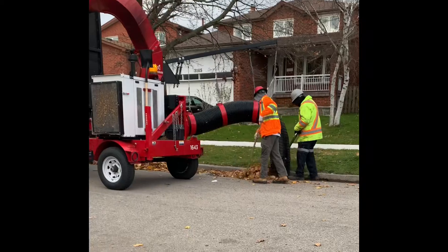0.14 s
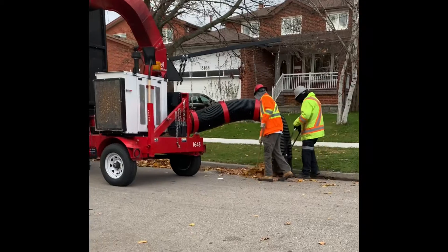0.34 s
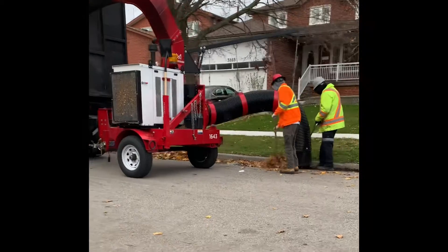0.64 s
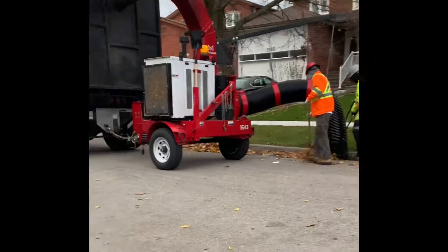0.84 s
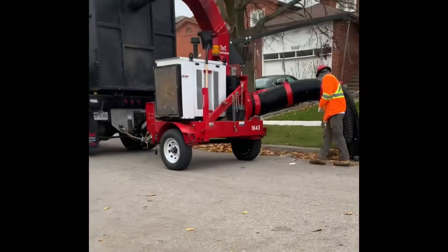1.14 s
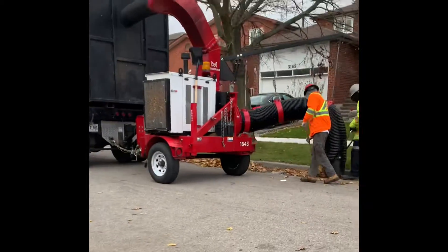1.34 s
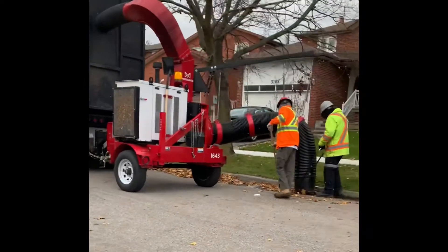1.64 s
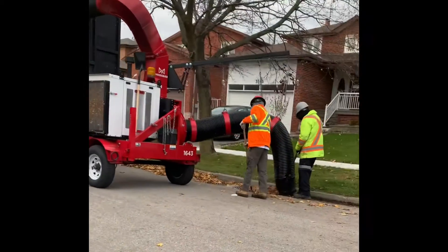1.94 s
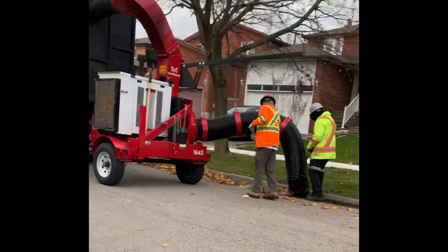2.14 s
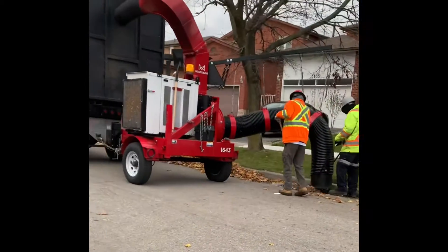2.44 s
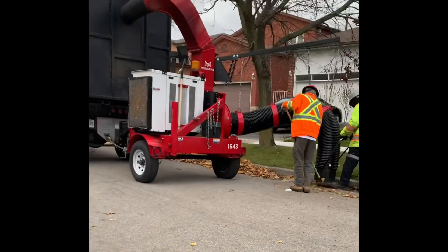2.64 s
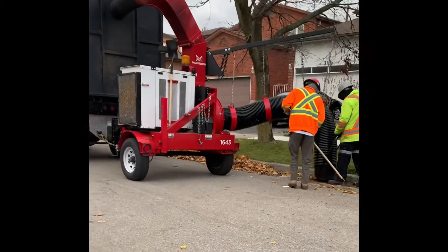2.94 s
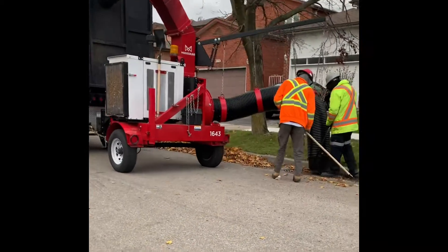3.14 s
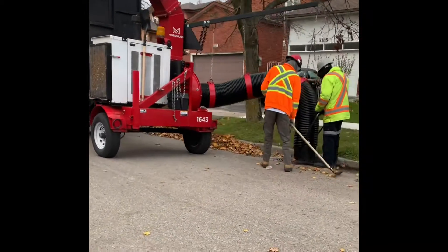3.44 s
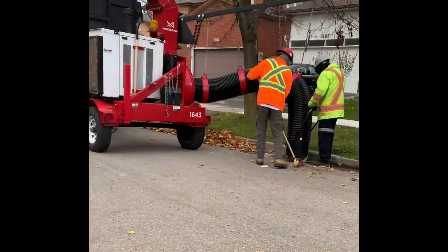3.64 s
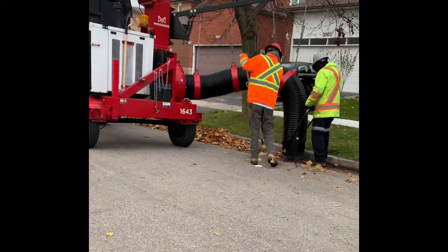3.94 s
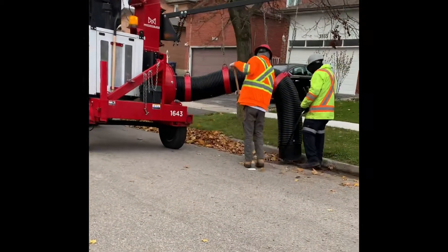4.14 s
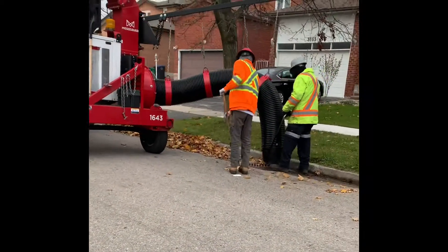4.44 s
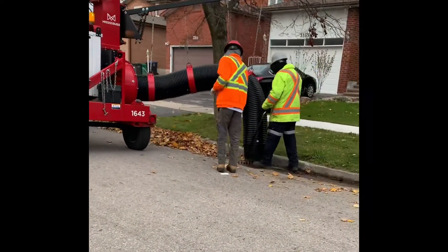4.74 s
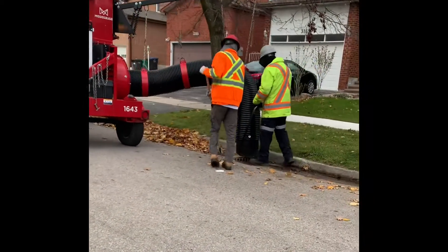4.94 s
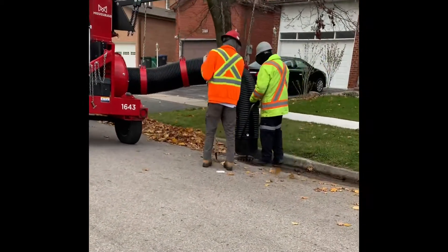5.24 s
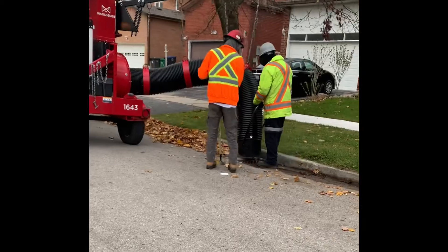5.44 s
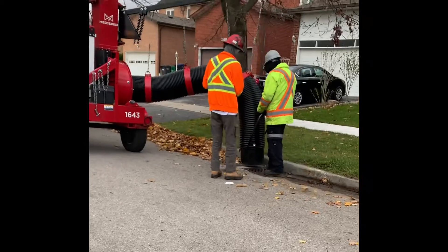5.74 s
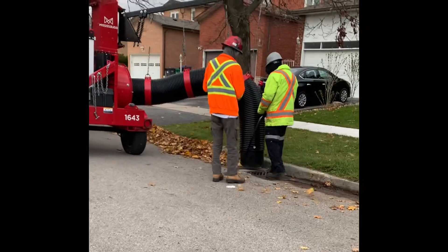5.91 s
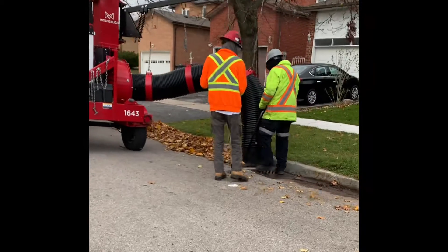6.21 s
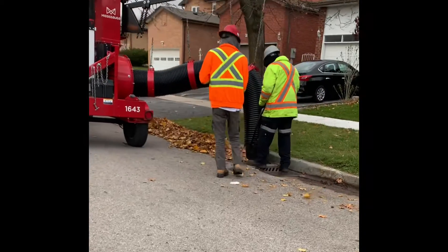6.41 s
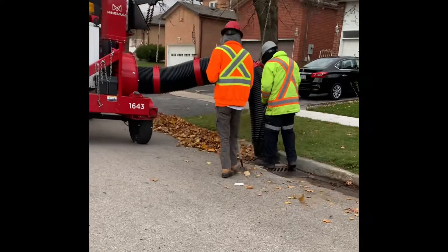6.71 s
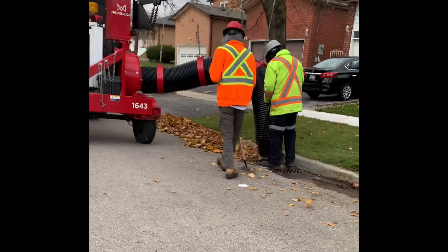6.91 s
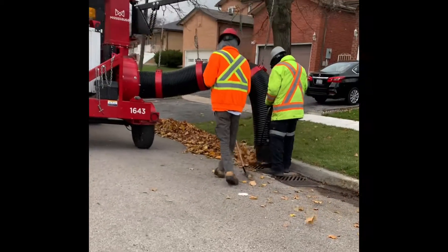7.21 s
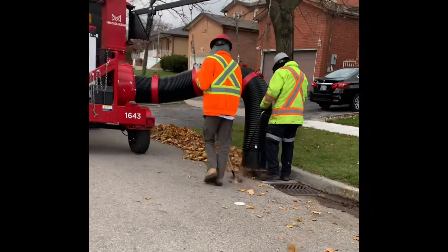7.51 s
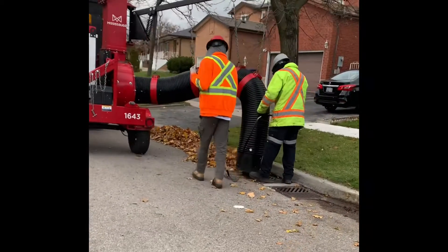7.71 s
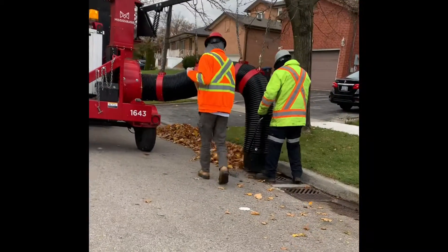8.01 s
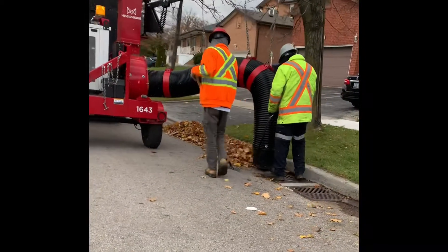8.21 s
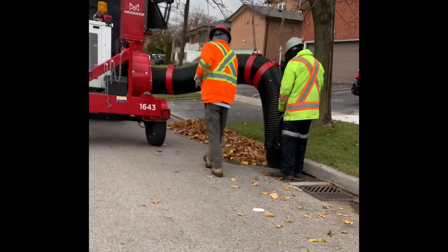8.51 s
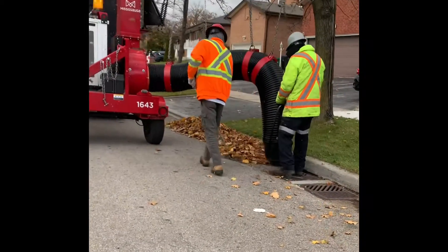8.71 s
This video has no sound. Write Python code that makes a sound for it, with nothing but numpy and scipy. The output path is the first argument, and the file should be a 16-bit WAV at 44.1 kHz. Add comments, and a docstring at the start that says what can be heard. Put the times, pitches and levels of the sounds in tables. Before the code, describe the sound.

A continuous loud machine, heard from some distance and then nearer in wide stereo: rough engine rumble, metallic ticking, thin fan whine and turbulent air. Early on, leaves rustle and crackle and twigs snap sharply inside the housing. Past the middle the clatter brightens as the engine is passed, then the blade hum and rushing roar swell near the hose on the open street.

```python
"""A trailer-mounted leaf vacuum runs at governed speed in a street while the listener walks closer.
Its four-cylinder engine sums cycle harmonics and pulsed noise into throb and clatter; a cooling fan whines.
The impeller adds blade-passing tones, and fluttering noise and wandering resonances carry the airflow.
Leaves crackle as random grains of noise; hard debris strikes the steel housing in decaying bursts."""
import sys
import numpy as np
from scipy import signal
from scipy.fft import rfft, irfft, next_fast_len
from scipy.io import wavfile

SR = 44100
rng = np.random.default_rng(int(sys.argv[2]) if len(sys.argv) > 2 else 0)


def dump(signal):
    """Clip the signal to [-1, 1] and save it as 16-bit WAV at the path in sys.argv[1]."""
    limited = np.clip(np.atleast_2d(signal).T, -1, 1)
    pcm = np.round(limited * 32767).astype(np.int16)
    wavfile.write(sys.argv[1], SR, pcm)


N = 390726
TIME = np.arange(N) / SR
SIZE = next_fast_len(N, True)
BINS = np.maximum(np.arange(SIZE // 2 + 1) * SR / SIZE, 1)  # frequency of each bin in Hz


def from_db(db):
    """Logarithmic level: decibels become an amplitude gain."""
    return 10 ** (np.asarray(db) / 20)


def rms_one(x):
    """Effective value: scale a signal to unit rms."""
    return x / np.sqrt(np.mean(x ** 2) + 1e-20)


def in_time(rows):
    """Linear interpolation: each column of a curve, sample by sample."""
    s, *columns = np.transpose(rows)
    return [np.interp(TIME, s, column) for column in columns]


def drift(rate_hz):
    """Low-passed noise: a random fluctuation of unit rms, drawn every 100 samples."""
    pole = np.exp(-200 * np.pi * rate_hz / SR)
    noise = rng.standard_normal(N // 100 + 2002)
    slow = signal.lfilter([1], [1, -2 * pole, pole * pole], noise)[2000:]  # drop the filter's start-up
    return np.interp(np.arange(N) / 100, np.arange(len(slow)), rms_one(slow))


def shape(points):
    """Spectral envelope: gain per bin, falling 24 dB per octave below the first point."""
    hz, db = np.transpose(points)
    level_db = np.interp(np.log(BINS), np.log(hz), db)
    octaves_below = np.maximum(0, np.log2(hz[0] / BINS))
    return from_db(level_db - 24 * octaves_below)


def resonances(table):
    """Modal superposition: response of a metal part with these modes, per frequency bin."""
    return sum(from_db(db) / np.sqrt(width) / (1 + 2j * (BINS - hz) / width) for hz, width, db in table)


def bump(at_s, half_length_s, db):
    """Gaussian level swell: rises or dips smoothly by db around one moment."""
    return from_db(db * np.exp(-((TIME - at_s) / half_length_s) ** 2))


# The walk towards the machine, as its loudness: start_s [s], level_db [dB]
APPROACH = [(0.1, -50.5), (3.13, -43), (6.41, -38), (7.33, -36), (7.54, -35.5), (8.56, -34), (8.75, -33.5)]


def nearing(db, follows):
    """Level growth with proximity: db at the walk's mean level, scaled by how strongly it follows."""
    near_db, = in_time(APPROACH)
    return from_db(db + follows * (near_db - near_db.mean()))


# Two spaced microphones: frequency_hz [Hz], left_lead_rad [rad], likeness [0 to 1], left_minus_right_db [dB]
MICS = [(90, 0, .66, 0), (400, -.2, .85, .7), (700, 0, .89, 3.7), (1100, -.7, .92, -.3),
        (1900, 0, .88, -.4), (2450, .9, .5, -.6), (3000, 1.2, .78, 0), (4500, 1.2, .98, 0)]
# In the treble the right microphone hears the machine a moment later
MIC_LAG_S, MIC_LAG_ABOVE_HZ = .000238, 3420


def at_mics(direct, gain, envelope=1):
    """Partial coherence: coloured direct sound with a phase lag, along with diffuse street scatter."""
    hz, *columns = np.transpose(MICS)
    lead, alike, balance_db = [np.interp(BINS, hz, column) for column in columns]
    lead = lead + 2 * np.pi * MIC_LAG_S * np.maximum(BINS - MIC_LAG_ABOVE_HZ, 0)
    sides = np.array([[1], [-1]])  # left, right
    straight = rfft(rms_one(direct) * envelope, SIZE) * np.exp(.5j * sides * lead)
    scatter = rfft(rng.standard_normal((2, N)) * envelope, SIZE)
    both = np.sqrt(alike) * straight + np.sqrt(1 - alike) * scatter
    balance = from_db(sides * balance_db / 2)
    return rms_one(irfft(both * gain * balance, SIZE)[:, :N])


def tone(turns, waver, rate_hz):
    """Narrow-band modulation: a line of rms 1 whose strength and phase waver."""
    angle = 2 * np.pi * (turns + rng.random())
    in_phase = (1 + waver * drift(rate_hz)) * np.sin(angle)
    quadrature = waver * drift(rate_hz) * np.cos(angle)
    return rms_one(in_phase + quadrature)


# Relative clatter of each cylinder in firing order: level_db [dB]
CYLINDERS_DB = [4.5, 12.5, 8.5, -4.5]


def knocks(firings, decay_s, uneven_db):
    """Impulsive excitation: jumps at each firing and dies away; the cylinders differ."""
    at = np.flatnonzero(np.diff(np.floor(firings)))
    kicks = np.zeros(N)
    kicks[at] = from_db(np.resize(CYLINDERS_DB, len(at)) + uneven_db * rng.standard_normal(len(at)))
    return rms_one(signal.lfilter([1], [1, -np.exp(-1 / (decay_s * SR))], kicks))


# Engine lines: cycle_multiple [1], level_db [dB at the walk's mean level], follows_approach [1]
ENGINE_ORDERS = [(4, -48.5, 0.8), (5, -52.5, 1), (6, -57, 0.64), (7, -59.5, -0.17), (8, -57, -0.3),
                 (9, -53, 0.64), (10, -52.5, 0.32), (11, -54, 1.6), (13, -49, 1.27), (14, -49.5, 1.1),
                 (15, -57, 0.87), (16, -57, 0.78), (17, -63, 1.2), (18, -51, 1.43), (20, -63, 1.1),
                 (21, -56.5, 0.7), (24, -68.5, 2.3)]
# Exhaust drone at three times the firing rate: start_s [s], level_db [dB]
EXHAUST_DRONE = [(0, -57), (.6, -48.5), (1, -65), (1.4, -56), (1.75, -44), (2.5, -49), (3.5, -49),
                 (4.4, -45.5), (5.3, -45), (5.75, -54), (6.3, -40.5), (6.85, -44), (7.3, -42), (7.7, -35),
                 (8.2, -37.5), (8.65, -33.5)]
# Relative spectra of the exhaust and the casing's rumble: frequency_hz [Hz], level_db [dB per Hz]
EXHAUST = [(20, -23), (35, -7), (48, 1), (60, 5.5), (85, 10), (115, 13), (150, 5.5), (200, -9), (400, -56)]
RUMBLE = [(90, -10), (140, -5), (175, -0.5), (215, 1), (260, -1), (320, -4), (390, -6.5), (450, -18.5),
          (700, -33.5)]
# The deepest rumble dips briefly: centre_s [s], half_length_s [s], change_db [dB]
RUMBLE_DIP = (2.7, 0.64, -3)
PUFFS_DB, EXHAUST_FOLLOWS = -43, 1.12
CASING_DB, CASING_FOLLOWS = -41, 1.15


def engine(firings):
    """Harmonics of the four-stroke cycle: wavering lines over a rough rumble pulsed by the firings."""
    cycles = firings / len(CYLINDERS_DB)
    lines = sum(nearing(db, follows) * tone(cycles * order, waver=.2, rate_hz=3)
                for order, db, follows in ENGINE_ORDERS)
    drone = from_db(in_time(EXHAUST_DRONE)[0]) * tone(3 * firings, waver=.2, rate_hz=4)
    puffs = at_mics(rng.standard_normal(N), shape(EXHAUST))
    throb = 3.5 + .31 * knocks(firings, decay_s=.014, uneven_db=7)
    casing = at_mics(rng.standard_normal(N), shape(RUMBLE), throb)
    rumble = nearing(PUFFS_DB, EXHAUST_FOLLOWS) * bump(*RUMBLE_DIP) * puffs
    rumble = rumble + nearing(CASING_DB, CASING_FOLLOWS) * casing
    return rumble + (lines + drone) * from_db([[.5], [-.5]])  # left slightly louder


# Whine of the belt-driven cooling fan: start_s [s], level_db [dB]
COOLING_FAN = [(0, -54.5), (1, -49), (2, -44), (5.6, -48.5), (6.6, -39.5), (8.86, -51)]
COOLING_FAN_HZ = 166.6  # at governed speed


def cooling_fan(governed_time):
    """Geared rotation: a wavering tone whose pitch keeps a fixed ratio to the engine speed."""
    whine = tone(COOLING_FAN_HZ * governed_time, waver=.17, rate_hz=3)
    return from_db(in_time(COOLING_FAN)[0]) * whine * from_db([[.5], [-.5]])


# Relative spectrum of the ticks: frequency_hz [Hz], level_db [dB per Hz]
CLATTER = [(1000, -25), (2500, -7), (5000, -6), (7600, -7), (8900, 1), (9800, -3), (11700, -3),
           (13000, -10), (15800, -12)]
# Engine metal rings: pitch_hz [Hz], width_hz [Hz], level_db [dB, relative]
METAL = [(3100, 200, -4), (7130, 80, -7), (8370, 90, -2), (8780, 40, -4), (8890, 60, 1), (9060, 100, -3),
         (9225, 45, -1), (9400, 60, -7), (10060, 50, -8), (10730, 30, -3), (11100, 55, -2), (11220, 50, -6),
         (11430, 40, -5), (11900, 50, -8), (12300, 50, -9), (14930, 90, -10)]
TICKS_DB, RINGS_DB, CLATTER_FOLLOWS = -55, -53.5, .94
# The clatter swells while passing beside the engine
BESIDE_ENGINE_S, BESIDE_WIDTH_S, BESIDE_DB = 4.5, 1, 3.5


def clatter(firings):
    """Impact-excited resonance: injectors and valves tick at every firing and set metal ringing."""
    tick_pulses = knocks(firings, decay_s=.005, uneven_db=2.3)
    ring_pulses = knocks(firings, decay_s=.012, uneven_db=3)
    ticks = at_mics(rng.standard_normal(N), shape(CLATTER), tick_pulses)
    rings = at_mics(rng.standard_normal(N), resonances(METAL), ring_pulses)
    swell = from_db(1.5 * drift(9)) * bump(BESIDE_ENGINE_S, BESIDE_WIDTH_S, BESIDE_DB)
    return swell * (nearing(TICKS_DB, CLATTER_FOLLOWS) * ticks + nearing(RINGS_DB, CLATTER_FOLLOWS) * rings)


BLADE_RATIO = 1.9528  # blade passes per engine firing
# Blade hum, faint behind the machine, swelling as the housing comes into view: start_s [s], level_db [dB]
BLADE_HUM = [(.5, -44.5), (1.5, -49.5), (2.3, -57), (3.2, -49.5), (5.6, -49.5), (6.15, -36.5), (6.35, -39),
             (6.6, -30), (7.1, -30), (7.4, -26), (8.8, -28)]
# Overtones, which beam out from the side of the housing:
# start_s [s], second_harmonic_db [dB], third_harmonic_db [dB]
OVERTONES = [(0, -59.5, -73), (1.5, -59, -58), (2.3, -47.5, -66), (3.2, -49.5, -51), (3.9, -50, -58.5),
             (4.3, -55, -49.5), (4.8, -41.5, -52.5), (5.2, -44, -62), (5.7, -47, -44), (6.1, -46, -46),
             (6.8, -55, -43.5), (7.4, -43, -42), (7.85, -40, -39.5), (8.1, -37, -51), (8.8, -39.5, -45.5)]
# Impeller whines: pitch_hz [Hz at governed speed], level_db [dB, relative]
WHINES = [(726.5, -2), (790, -7), (907, 2.5), (1380, -7), (1512, -4), (1820, -7), (2908, -10), (3139, -11)]
WHINE_DB, WHINE_FOLLOWS = -56, .25
# The whines are screened until the impeller housing comes into the open
WHINE_OPENS_S, WHINE_OPENING_S, WHINE_SCREENED_DB = 3.08, .1, -11


def impeller(firings, governed_time):
    """Blade-passing tones: blades pass the housing's lip, giving a deep hum, overtones and thin whines."""
    blades = BLADE_RATIO * firings
    hum = from_db(in_time(BLADE_HUM)[0]) * tone(blades, waver=.025, rate_hz=3.3)
    overtones = sum(from_db(db) * tone(harmonic * blades, waver=.32, rate_hz=4.5)
                    for harmonic, db in enumerate(in_time(OVERTONES), 2))
    whine = sum(from_db(db) * tone(hz * governed_time, waver=.12, rate_hz=6) for hz, db in WHINES)
    screened = (1 - np.tanh((TIME - WHINE_OPENS_S) / WHINE_OPENING_S)) / 2  # 1 hidden, 0 open
    screen = from_db(WHINE_SCREENED_DB * screened)
    tones = hum + overtones + nearing(WHINE_DB, WHINE_FOLLOWS) * screen * whine
    return tones * from_db([[.7], [-.7]])  # left slightly louder


def cyclic_noise(firings, repeat, size=2700):
    """Cyclostationary noise: a share of its power comes back with every four-stroke cycle."""
    one_cycle = signal.resample(rng.standard_normal(size), size * 4)
    again = np.interp(firings / 4 % 1, np.linspace(0, 1, len(one_cycle)), one_cycle)
    return np.sqrt(repeat) * again + np.sqrt(1 - repeat) * rng.standard_normal(N)


# Edges of the bands in which the airstream flutters: frequency_hz [Hz]
EDDY_EDGES_HZ = [550, 800, 1150, 1650, 2400, 3500, 6000, 10000]
EDDY_DB, EDDIES_PER_S = 1.7, 22


def flutter(air):
    """Turbulent modulation: eddies make each band of an airstream swell and sink on its own."""
    out = 0
    for hz in EDDY_EDGES_HZ:
        band = signal.sosfiltfilt(signal.butter(2, hz, fs=SR, output="sos"), air)
        air = air - band  # what remains goes to the higher bands
        out = out + band * from_db(EDDY_DB * drift(EDDIES_PER_S))
    return out + air * from_db(EDDY_DB * drift(EDDIES_PER_S))


# Relative spectra of the housing's roar and the hose's hiss: frequency_hz [Hz], level_db [dB per Hz]
ROAR = [(240, -14), (370, -4.5), (415, -6), (443, -5), (510, -1.5), (680, 1.55), (882, -0.6), (962, -2),
        (1080, -3.5), (1190, -1.7), (1480, -2.5), (1920, -7.5), (2070, -6.5), (2390, -12.5), (2600, -16.5),
        (3380, -18.5), (5720, -120)]
HISS = [(1500, -25), (2000, -5), (2450, -1.5), (2950, 1.2), (3450, -2.1), (4500, -1.8), (6000, -5.4),
        (7600, -8.2), (8900, -2.6), (10000, -6.8), (11800, -7.7), (13000, -12.6), (15000, -13.9)]
# The roar swells as the nozzle comes near: centre_s [s], half_length_s [s], rise_db [dB]
NOZZLE_ROAR = (8.2, 1, 2.1)
ROAR_DB, ROAR_FOLLOWS = -41, .85
HISS_DB, HISS_FOLLOWS = -44, .95


def airflow(firings):
    """Turbulent flow noise: air roars in the housing, throbbing with the firings, and hisses in the hose."""
    throb = 1 + .1 * knocks(firings, decay_s=.012, uneven_db=3)
    roar = at_mics(flutter(cyclic_noise(firings, repeat=.15)), shape(ROAR), throb)
    hiss = at_mics(flutter(cyclic_noise(firings, repeat=.27)), shape(HISS), from_db(.94 * drift(19.5)))
    roar = nearing(ROAR_DB, ROAR_FOLLOWS) * bump(*NOZZLE_ROAR) * roar
    return roar + nearing(HISS_DB, HISS_FOLLOWS) * hiss


# Relative resonances of the hose and chute: pitch_hz [Hz], level_db [dB]
DUCT_MODES = [(520, -4.5), (665, 0.5), (760, 2), (835, 0.5), (1010, -9.5), (1175, -4.5), (1215, -4),
              (1445, -4.5), (2005, -10), (2075, -3), (2125, -5)]
DUCT_DB, DUCT_FOLLOWS = -58.5, 1.04


def ducts():
    """Flow-excited resonance: turbulence sounds each mode in streaks, its pitch wandering with the flow."""
    streaks = 0
    for hz, db in DUCT_MODES:
        turns = hz * np.cumsum(1 + .008 * drift(3)) / SR
        streaks = streaks + from_db(db + 2 * drift(5)) * tone(turns, waver=2, rate_hz=12)
    return nearing(DUCT_DB, DUCT_FOLLOWS) * streaks * from_db([[.7], [-.7]])


# Relative spectrum of leaf crackle and bright strikes: frequency_hz [Hz], level_db [dB per Hz]
STRIKE = [(1200, -22), (2500, -11), (3500, -5), (4700, 0), (7000, -7), (9000, -7), (12000, -16),
          (15500, -24)]
# Loads of dry leaves go up the hose: centre_s [s], half_length_s [s], rise_db [dB]
LEAF_LOADS = [(1.182, 0.22, 5.5), (2.6, 0.86, 6.5), (8.5, 0.34, 2)]
CRACKLE_DB = -51


def leaf_crackle():
    """Random impact process: dry leaves crackle in clumps of decaying grains."""
    leaves_per_s = 600 * from_db(2.8 * drift(9))
    sizes = from_db(2.5 * np.minimum(rng.exponential(1, N), 3))
    leaves = (rng.random(N) < leaves_per_s / SR) * sizes
    grains = signal.lfilter([1], [1, -np.exp(-1 / (.007 * SR))], leaves + 1e-18)  # 7 ms decay
    crackle = at_mics(rng.standard_normal(N), shape(STRIKE), grains)
    loads = np.prod([bump(*load) for load in LEAF_LOADS], axis=0)
    return nearing(CRACKLE_DB, HISS_FOLLOWS) * crackle * loads


# Debris on the housing: start_s [s], level_db [dB before the crack], rise_s [s], t60_s [s],
# dull_body_db [dB relative to the bright burst]
DEBRIS = [(1.573, -37.5, .0003, .05, -10), (1.579, -47, .0003, .04, -10), (1.586, -43.5, .0003, .05, -10),
          (1.964, -41.5, .0005, .07, 0), (1.971, -45.5, .0003, .05, 5), (1.978, -47, .0003, .06, 8),
          (2.021, -41.5, .0005, .06, -2), (2.042, -38.5, .0005, .05, -8), (2.0515, -30, .0003, .06, -9),
          (2.0575, -37.5, .0003, .05, -9), (2.066, -45, .0003, .05, 1), (2.075, -44, .0003, .07, -2),
          (2.112, -40.5, .0005, .06, -10), (2.122, -39, .0003, .06, -10), (2.129, -40.5, .0003, .09, -10),
          (2.745, -43, .0046, .3, -2), (2.834, -39.5, .0006, .1, -5), (2.944, -41, .0006, .08, -8)]
# Relative spectrum of the dull knock: frequency_hz [Hz], level_db [dB per Hz]
THUD = [(300, -9), (700, 14), (1100, 4.5), (1550, 13), (2400, 1), (5000, -39)]
# The struck housing rings: pitch_hz [Hz], width_hz [Hz], level_db [dB, relative]
HOUSING = [(3300, 240, -33), (4600, 290, -6), (5950, 320, -6), (6600, 300, -8)]
HOUSING_DB = -5  # relative to the bright burst
CRACK_DB, CRACK_T60_S = -4, .014  # each strike opens with a brief crack


def debris():
    """Transient impact: twigs and grit shatter in ragged bursts over a dull knock; steel rings briefly."""
    bright, dull = np.zeros((2, N))
    age = TIME[:SR // 2]
    crack = from_db(CRACK_DB - np.minimum(60 * age / CRACK_T60_S, 120))
    for s, db, rise, t60, body_db in DEBRIS:
        span = int(s * SR) + np.arange(len(age))
        dying = from_db(-60 * age / t60) + crack
        burst = from_db(db) * dying * (1 - np.exp(-age / rise))
        bright[span] += burst
        dull[span] += burst * from_db(body_db)
    splinters = from_db(1.5 * drift(600))  # so fast that each drawn value is nearly independent
    ringing = bright * from_db(HOUSING_DB)
    layers = [(bright, shape(STRIKE)), (dull, shape(THUD)), (ringing, resonances(HOUSING))]
    return sum(np.sqrt(np.mean(envelope ** 2)) * at_mics(rng.standard_normal(N), colour, envelope * splinters)
               for envelope, colour in layers)


# Engine speed: start_s [s], firing_rate_hz [firings per s]
SPEED = [(0, 64.4), (.35, 63.3), (.8, 65.05), (1.2, 65.2), (1.7, 64.7), (2.3, 65.35), (2.9, 65.1),
         (3.7, 65.4), (4.6, 65.07), (8.86, 65.03)]


def scene():
    """Common drive: one crankshaft paces engine, fan, clatter and impeller."""
    firings = np.cumsum(in_time(SPEED)[0]) / SR - .75
    governed_time = firings / SPEED[-1][1]  # runs slow when the engine sags under load
    motor = engine(firings) + cooling_fan(governed_time) + clatter(firings)
    air = airflow(firings) + ducts() + leaf_crackle()
    return motor + impeller(firings, governed_time) + air + debris()


def record(dry):
    """Band limitation: an elliptic low-pass cuts the top steeply at 15650 Hz."""
    return signal.sosfilt(signal.ellip(10, .1, 80, 15650, fs=SR, output="sos"), dry)


dry = scene()
out = record(dry)
dump(out)
```